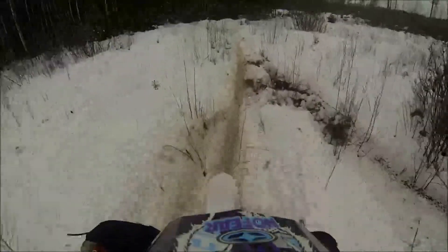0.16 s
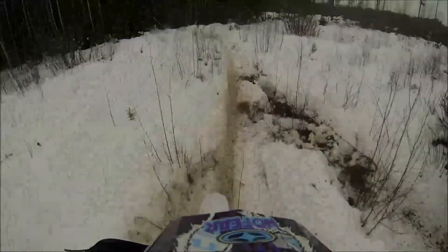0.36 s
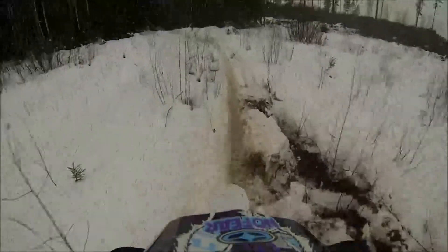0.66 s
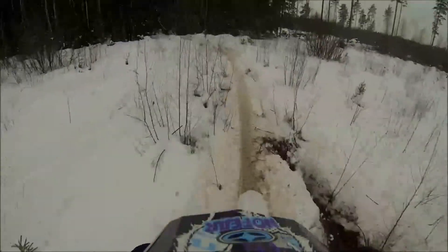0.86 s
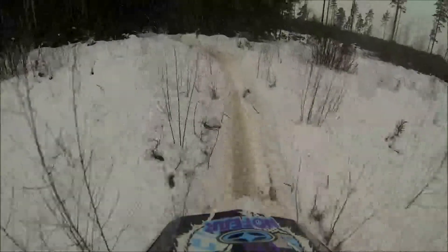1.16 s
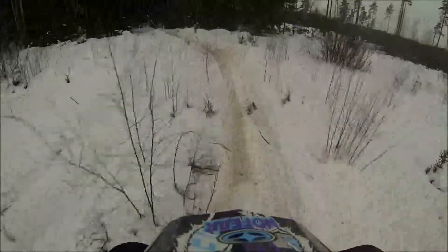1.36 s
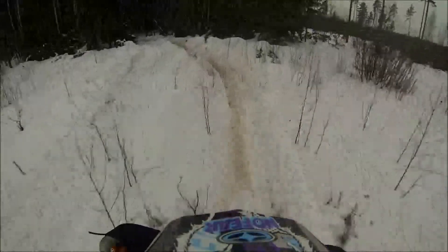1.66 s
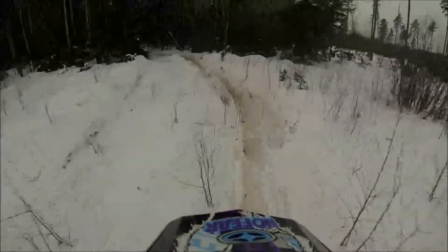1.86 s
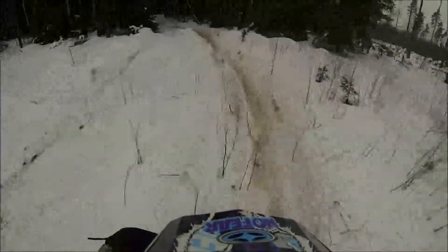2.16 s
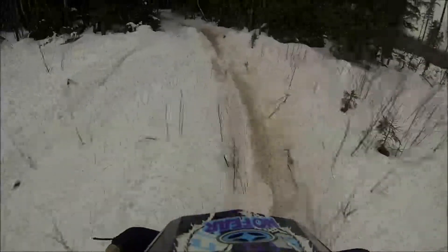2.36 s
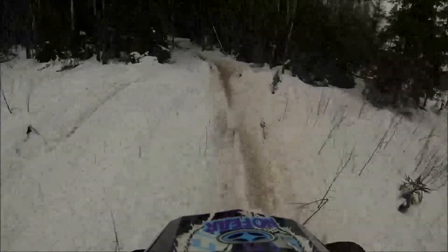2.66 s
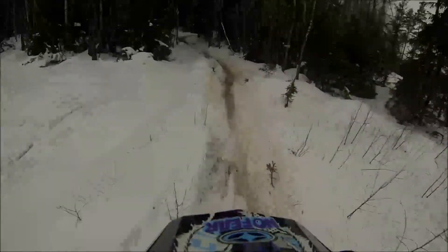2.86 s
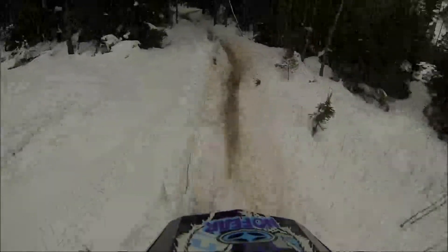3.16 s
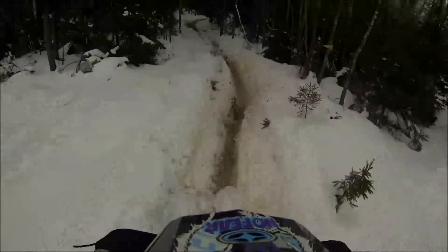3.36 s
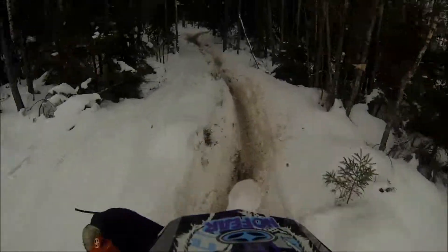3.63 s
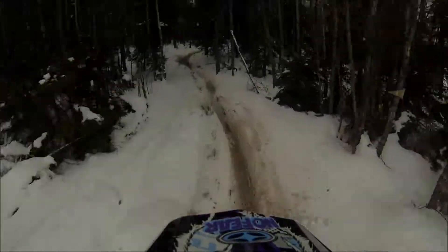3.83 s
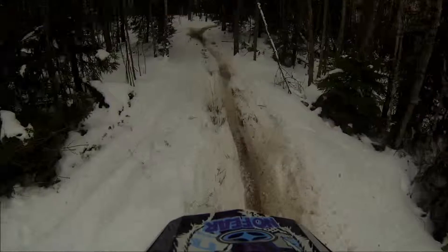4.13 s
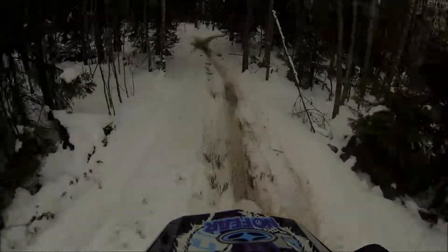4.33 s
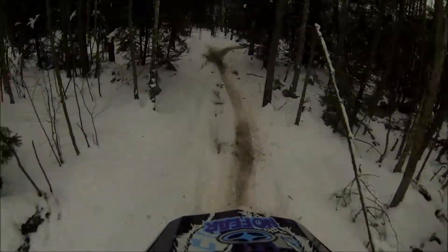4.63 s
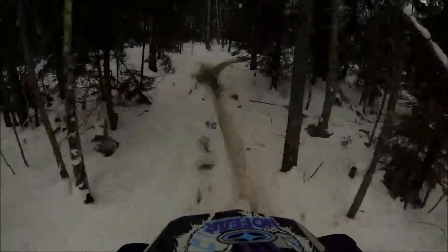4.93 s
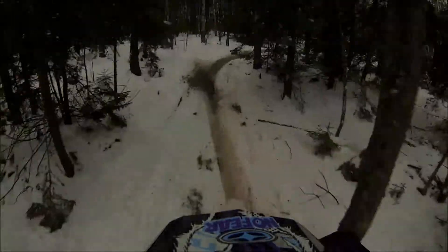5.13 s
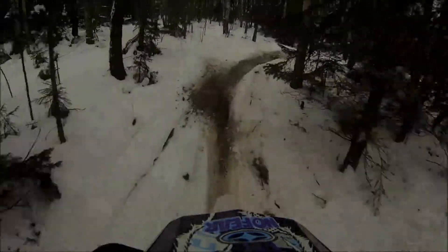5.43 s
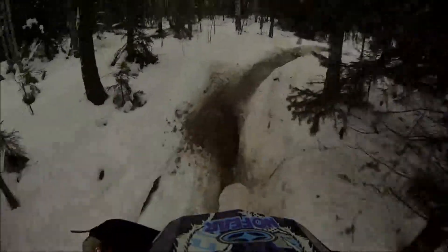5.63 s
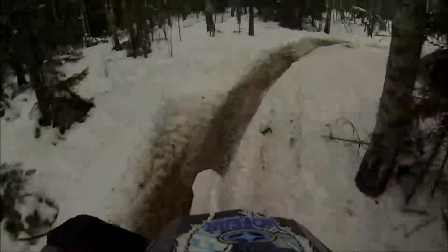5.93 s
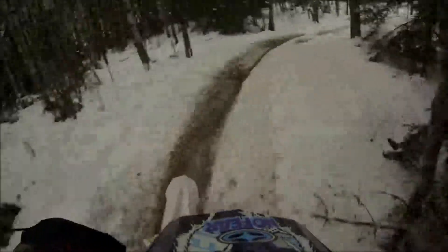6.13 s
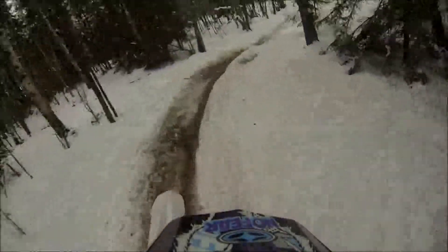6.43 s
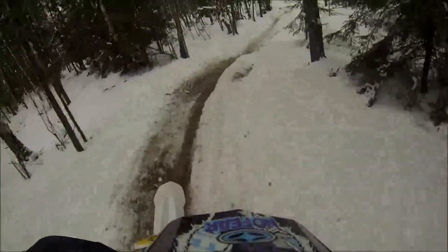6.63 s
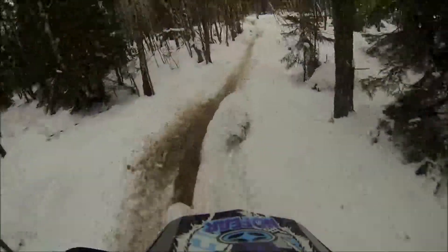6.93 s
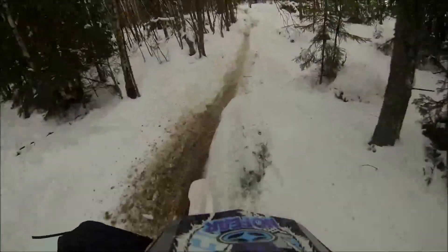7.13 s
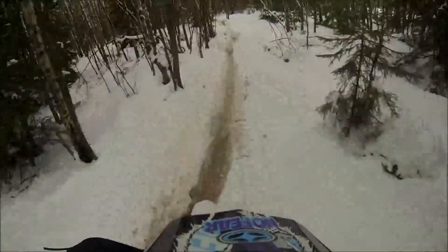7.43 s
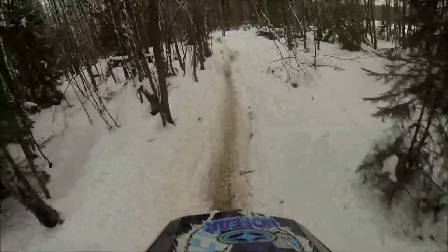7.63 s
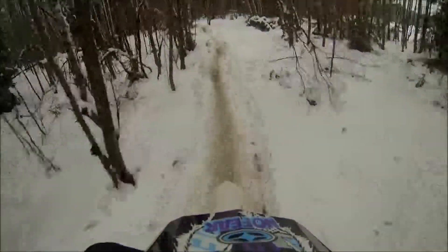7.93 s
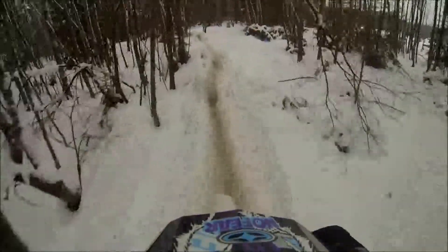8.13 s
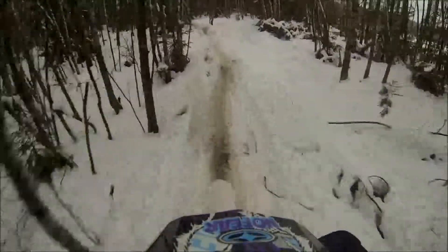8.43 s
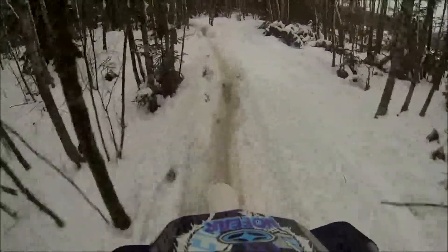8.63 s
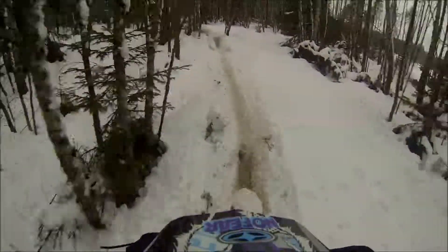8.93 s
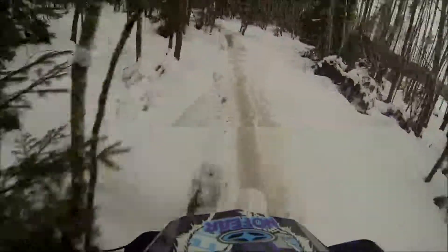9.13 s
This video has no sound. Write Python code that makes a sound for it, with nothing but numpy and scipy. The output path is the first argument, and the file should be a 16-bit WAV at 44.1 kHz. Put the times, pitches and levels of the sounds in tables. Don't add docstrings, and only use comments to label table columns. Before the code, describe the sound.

Close, boxy helmet-camera sound of a small motorcycle on slushy, rough ground. The exhaust sputters, then rises in several throttle pulls separated by coasting. Deep wind buffets, dull mount thumps, faint chatter and twig ticks run across it. A sharp crack comes before the highest revs; later, with the throttle closed, hard knocks and a short stuttering scrape. Slow lumpy firing follows, then brisk blips to the end. Loud hits briefly push everything down.

```python
import sys
import numpy as np
from scipy import signal
from scipy.fft import rfft, irfft, next_fast_len
from scipy.io import wavfile
from scipy.ndimage import uniform_filter1d

SR = 44100
rng = np.random.default_rng(int(sys.argv[2]) if len(sys.argv) > 2 else 0)


def store_wav(level_fs):
    pcm = np.round(np.clip(np.atleast_2d(level_fs), -1, 1) * 32767)
    wavfile.write(sys.argv[1], SR, pcm.T.astype(np.int16))


def invert_db(level):
    return 10 ** (np.asarray(level, dtype=float) / 20)


N = 409248
T = np.arange(N) / SR
MS = np.arange(0, N / SR, .001)

# (frequency [Hz], width [Hz], level [dB])
KNOCK_MODES = [(1430, 258, 0.0051), (335, 93, 0.0027)]


def level(x):
    return x / np.sqrt(np.mean(x ** 2))


def ring(x, modes, order=1):
    size = next_fast_len(N + SR)
    s = 1j * np.arange(size // 2 + 1) * SR / size
    shape = 0
    for k, (hz, width_hz, db) in enumerate(modes):
        resonance = width_hz * s / (s * s + width_hz * s + hz * hz)
        shape = shape + (-1) ** k * invert_db(db) * resonance ** order
    return irfft(rfft(x, size) * shape, size)[:N]


def colour(x, points):
    hz, db = np.transpose(points)
    grid = np.arange(N // 2 + 1) * SR / N + 1
    gain_db = np.interp(np.log(grid), np.log(hz), db, -120, -120)
    return irfft(rfft(x) * invert_db(gain_db), N)


def curve(rows):
    s, *columns = np.transpose(rows)
    return [np.interp(T, s, column) for column in columns]


def walk(rate):
    hold = int(SR / rate)
    steps = np.repeat(rng.standard_normal(N // hold + 1), hold)
    return 1.27 * uniform_filter1d(steps, hold)[:N]


def add(out, s, shape):
    i = int(s * SR)
    out[i:i + len(shape)] += shape[:N - i]


def push(length_s):
    return np.hanning(int(max(length_s, .0002) * SR))


def gain_control_db():
    # (time [s], depth [dB])
    ducks = [(0.536, 6), (2.3, 1.5), (2.475, 0.5), (2.872, 11.5), (3.076, 9.5), (3.76, 11.5), (3.952, 19.5),
             (4.25, 5.5), (5.052, 28), (5.236, 12.5), (5.35, 2.5), (5.54, 8.5), (5.679, 15), (5.835, 23),
             (6.062, 26), (6.295, 16), (7.061, 9.5), (7.352, 15.5), (8.018, 9.5), (8.297, 14.5),
             (8.72, 10.5), (8.92, 6.5), (9.246, 12)]
    recover_s = 0.11
    drop_db = sum(db * np.exp(-np.maximum(MS - s, 0) / recover_s) * (MS > s) for s, db in ducks)
    return -np.interp(T, MS, uniform_filter1d(drop_db, size=5))


def wind():
    # (time [s], level [dB])
    calm_wind = [(0, -17.5), (1.0, -18.5), (1.9, -18.5), (2.5, -18.5), (3.3, -21), (4.1, -19.5),
                 (4.6, -18.5), (5.3, -22.5), (5.8, -16.5), (6.3, -23.5), (6.9, -16), (7.5, -21), (8.1, -18),
                 (8.6, -19.5), (9.28, -21.5)]
    # (time [s], swell [dB])
    gusts = [(.44, -5), (1.741, 6.5), (2.12, 1.5), (2.27, 1.5), (2.9, 10.5), (3.071, 11.5), (3.36, 9),
             (3.72, 6), (3.95, 8), (4.24, 6.5), (4.96, 5.5), (5.22, 8), (5.35, 6.5), (5.53, 6), (6.12, 8.5),
             (6.279, 13.5), (7.06, 5.5), (7.341, 8), (7.68, 5), (8.3, 7), (8.43, 0), (8.71, 4.5), (8.92, 5),
             (9.22, 9)]
    # (frequency [Hz], width [Hz], level [dB])
    air_modes = [(11, 15.1, -0.5), (22.57, 15.7, 1), (52.1, 53, -14.5), (89.7, 21, -14.5), (133, 137, -31)]
    gust_s, duck_share = 0.035, 0.32
    calm_db, = curve(calm_wind)
    gust_db = sum(swell_db * np.exp(-((MS - s) / gust_s) ** 2) for s, swell_db in gusts)
    wind_db = calm_db + np.interp(T, MS, gust_db) + duck_share * gain_control_db()
    rumble = level(ring(rng.standard_normal(N), air_modes, order=2))
    return invert_db(wind_db - 1.3 + 0.89 * walk(20)) * rumble


def spray():
    # (start [s], length [s], level [dB])
    throws = [
        (0, 0.0095, -44),
        (6.422, .3, -62),
        (6.76, .03, -58),
        (6.816, 0.073, -56.5),
        (6.918, .43, -64.5),
    ]
    size = 0
    for s, length_s, db in throws:
        flying = (MS >= s) * (MS < s + length_s)
        size = size + invert_db(db - 6.8 * (MS - s) / length_s) * flying
    fade = np.interp(T, MS, uniform_filter1d(size, size=14))
    droplets = [(5570, 1200, 7.0), (8900, 2500, -3.5), (12500, 3500, -7)]
    hiss = level(ring(rng.standard_normal(N), droplets, order=2))
    return fade * invert_db(2.5 * walk(50)) * hiss


def slaps():
    # (time [s], peak [dB], push or pull [signed factor])
    slap_events = [(2.28, -11, -0.78), (3.071, 9, 0.097), (3.859, -9.5, -0.87), (4.248, -23, -0.88),
                   (4.408, -32, -1.6), (4.91, -12, -1.11), (5.228, -11.5, -1.15), (5.34, -17.5, -1.2),
                   (5.987, -18, -1.3), (7.349, -1, -0.68), (8.006, 0.5, -0.54), (8.688, -16, -0.83),
                   (8.91, -13, -1.5), (9.241, -12, -0.72), (6.06, -4.5, -0.66), (5.041, -2, 0.77),
                   (8.719, -21, 0.34)]
    force = np.zeros(N)
    for s, db, way in slap_events:
        add(force, s - .006, way * invert_db(db + 1.5) * push(0.011))
    return ring(force, [(41, 88, 0.0026)])


def bumps():
    # (time [s], peak [dB], sharp
    # edge over peak [dB])
    big_thumps = [(0.207, -7, -16.5), (0.295, -10, -16), (0.584, -10.5, -20), (0.909, -13, -19),
                  (1.638, -7.5, -22.5), (1.89, -8.5, -12.5), (2.728, -8, -14.5), (3.412, -9.5, -21),
                  (3.567, -11.5, -8), (3.765, -8, -12), (3.937, -13, -14), (4.45, -9, -24), (4.576, -11, 0),
                  (4.66, -9, -21), (4.811, -9.5, -14), (4.977, -9.5, -1), (5.672, -10.5, -3.5),
                  (5.754, -7, -5), (5.988, -11, -20.5), (6.05, -10, -22.5), (6.288, -0.5, -34),
                  (6.873, -11.5, 2), (7.086, -10, -23.5), (7.899, -8.5, 9), (8.063, -10, -5),
                  (8.274, -10, -22.5), (8.44, -11, 1), (8.587, -10, -12), (8.943, -9, 0),
                  (9.105, -8.5, -4.5)]
    # (time [s], peak [dB])
    ripples = [(0.53, -17), (0.684, -18.5), (0.854, -17), (2.257, -13.5), (2.49, -19), (3.116, -12.5),
               (4.022, -16.5), (5.141, -20.5), (5.323, -24), (5.602, -23.5), (7.336, -14), (7.402, -16),
               (7.998, -24), (8.68, -20), (8.736, -11.5)]
    # (frequency [Hz], width [Hz], level [dB])
    mount_modes = [(86.5, 9.2, 10.46), (114.6, 74, 1.64)]
    ripple_edge_db = -11
    force = np.zeros(N)
    for s, db, edge_db in big_thumps + [(s, db, ripple_edge_db) for s, db in ripples]:
        shape = push(0.0047 * invert_db(-.3 * (edge_db + 7.5)))
        add(force, s, invert_db(db + 46.0) * shape / shape.sum())
    return ring(force, mount_modes)


def rattles():
    # (time [s], peak [dB])
    chatter = [(0.2184, -38), (0.2284, -48), (0.2778, -59), (0.2778, -42.5), (0.3072, -48), (0.3247, -43),
               (0.336, -53), (0.408, -43), (0.4754, -46.5), (0.5201, -36.5), (0.5502, -46), (3.77, -43.5),
               (3.7982, -47), (3.8147, -42), (3.8751, -43), (3.8824, -46.5), (4.25, -38.5), (5.8886, -50.5),
               (5.8984, -49), (5.9024, -56), (8.6953, -38), (8.7076, -47), (8.751, -40),
               (1.7839, -46), (1.9076, -38), (2.0254, -40.5), (2.0718, -43), (2.2683, -34.5),
                     (2.3801, -47), (2.4045, -43), (2.4334, -39), (2.5003, -45), (2.6764, -49),
                     (4.8402, -38.5), (4.9111, -41), (4.9849, -34.5), (5.0388, -34), (5.162, -46),
                     (5.183, -47), (5.2294, -36), (5.3092, -56), (5.3416, -51), (5.5611, -44),
                     (5.6075, -42), (5.6569, -44), (5.6783, -47), (5.7043, -49), (3.0804, -34),
                     (5.9429, -53.5), (6.0464, -35.5), (6.0604, -42.5), (6.2397, -38)]
    clicks = np.zeros(N)
    for s, db in chatter:
        add(clicks, s - .0005, invert_db(db) * push(.0035))
    clicks = clicks * rng.standard_normal(N)
    bright = invert_db(2) * ring(clicks, [(3220, 2780, 0)], order=2)
    dull = invert_db(3) * ring(clicks, [(640, 320, 0.01)])
    return bright + dull


def twigs():
    # (time [s], peak in the housing [dB], shell over peak [dB])
    ticks = [(0.257, -43, -8), (2.071, -22, -21.5), (2.27, -20, -20.5), (2.4928, -21, -27),
             (2.8681, -32.5, -7), (3.0563, -15.5, -31), (3.742, -40, -0.5), (3.687, -23.5, -24),
             (3.849, -29, -26), (3.8621, -41, -14), (4.2382, -38.5, -7.5), (4.724, -28, -16),
             (4.9098, -43, -11), (4.9847, -55, 4), (5.0414, -45, -3.5), (5.2304, -42.5, 0),
             (5.3088, -26, -42), (5.4004, -25.5, -31.5), (5.6068, -26.5, -15), (5.6775, -45, 0),
             (5.982, -49.5, -3.5), (6.4284, -24, -39), (6.6943, -26, -31), (7.3309, -21, -25),
             (8.0086, -37, -1), (8.9134, -28.5, -11.5), (9.229, -37.5, -4.5)]
    # (time [s], peak [dB], fade [s])
    scrape = [
        (5.7724, 0.5, 0.0067),
        (5.7854, -11, 0.0075),
        (5.793, -10.5, 0.0074),
        (5.807, -7, 0.0046),
        (5.8123, -6.5, 0.0053),
        (5.8224, -13.5, 0.002),
    ]
    # (frequency [Hz], width [Hz], level [dB])
    twig_modes = [(1426, 295, 12), (3010, 520, 8), (5000, 1900, -3), (11300, 9700, -36), (576, 230, 0)]
    low, high, slip = np.zeros((3, N))
    for s, db, shell_db in ticks:
        add(low, s - .001, invert_db(db + 9.5) * push(0.012))
        add(high, s - .001, invert_db(db + shell_db + 6.0) * push(0.0048))
    for s, db, fade_s in scrape:
        add(slip, s, invert_db(db - 6.0) * np.exp(-T[:1500] / fade_s))
    low_noise, high_noise = rng.standard_normal((2, N))
    housing = ring(low * low_noise, KNOCK_MODES[:1], order=2)
    shell = ring(high * high_noise, [(3420, 3100, 0.036)], order=2)
    return housing + shell + ring(slip * high_noise, twig_modes)


def cracks():
    # (time [s], peak [dB], body over peak [dB], contact [s])
    crack_events = [
        (3.9425, -2.5, -3, 0.00053),
        (5.754, -10, 3, 0.00042),
        (6.032, -46, -10, 0.00042),
        (6.0529, -17, 5.5, 0.00091),
        (6.285, -16.5, 4, 0.0008),
        (8.288, -13.5, 5.5, 0.00041),
    ]
    ping, body, splinter = np.zeros((3, N))
    for s, db, body_db, length_s in crack_events:
        add(ping, s - .0005, -invert_db(db + 2.5) * push(length_s))
        add(ping, s + 0.00102, -invert_db(db + 15.0) * push(length_s))
        add(body, s - .0006, invert_db(db + body_db + 9.0) * push(0.0017))
        add(splinter, s - .0005, invert_db(db - 2.5) * push(0.0041))
    splinter = ring(splinter * rng.standard_normal(N), [(2770, 1460, 0.012)], order=2)
    knock = ring(ping, KNOCK_MODES[:1]) + ring(body, KNOCK_MODES[1:]) + .3 * body + splinter
    flat = .8 * np.tanh(knock / .8)
    return signal.lfilter(*signal.butter(2, 5500, fs=SR), flat)


def throttle(fade_db_s):
    # (start [s], length [s], bark at the end [dB], climb on the way [dB], boom over bark [dB])
    twists = [(0.0, 0.23, -43.5, -12.5, 8.5), (0.26, 0.29, -41.5, 2.5, 7), (0.587, 0.17, -29.5, 14, 6.5),
              (0.758, 0.11, -35, -4, 5), (0.916, 0.12, -29.5, -0.5, 8), (1.04, 0.26, -32, -0.5, 7.5),
              (1.321, 0.16, -29, 7.5, 6.5), (2.759, 0.1, -30.5, 7.5, 7), (3.112, 0.2, -29, 11, 7),
              (3.307, 0.2, -39.5, -5.5, 5.5), (3.98, 0.12, -34.5, 5.5, 6), (4.308, 0.093, -26.5, 4.5, 10),
              (4.438, 0.051, -34, -3, 6.5), (4.475, 0.27, -32.5, -1, -4), (6.424, 0.15, -41.5, 5.5, 8),
              (6.551, 0.11, -32, 0.5, 3.5), (6.866, 0.066, -32.5, 11, 6.5), (7.199, 0.098, -34, 2.5, 8),
              (7.49, 0.11, -28.5, 3, 5), (7.66, 0.088, -30, 5.5, 8.5), (7.785, 0.07, -30.5, -0.5, 2),
              (7.845, 0.046, -31, -5, 7), (8.064, 0.17, -32.5, 3.5, 6), (8.384, 0.18, -29, 7, 6)]
    open_db_s = 498.5
    best_db, boom_db = np.full(len(MS), -90.), np.zeros(len(MS))
    for s, length_s, db, climb_db, low_db in twists:
        held_db = db - climb_db * np.clip(1 - (MS - s) / length_s, 0, 1)
        before_s, after_s = np.maximum(s - MS, 0), np.maximum(MS - s - length_s, 0)
        now_db = held_db - open_db_s * before_s - fade_db_s * after_s
        boom_db = np.where(now_db > best_db, low_db, boom_db)
        best_db = np.maximum(now_db, best_db)
    return np.interp(T, MS, best_db), np.interp(T, MS, uniform_filter1d(boom_db, size=30))


def lock(turns, times):
    slip = [0.]
    for at in np.interp(times, T, turns):
        slip.append(np.round(at + slip[-1]) - at)
    return turns + np.interp(T, times, slip[1:])


def engine():
    # (time [s], firing rate [Hz])
    revs = [
        [(0.0, 60.7), (0.174, 52.3), (0.3, 45.8), (0.38, 56.8), (0.5, 50.6), (0.6, 48.5), (0.7, 50),
         (0.82, 53.1)],
        [(0.86, 58), (1.048, 82.2), (1.068, 82.6), (1.12, 79.5), (1.146, 77.8), (1.244, 86.7), (1.285, 87.24)],
        [(1.316, 69.77), (1.42, 76.08), (1.524, 82.94), (1.7, 63)],
        [(2.72, 52.91), (2.794, 54.76), (3.004, 54.66), (3.154, 59.82), (3.256, 79.07), (3.332, 68.74),
         (3.4, 76.83), (3.524, 87)],
        [(4.0, 84.4), (4.162, 82), (4.288, 58.74)],
        [(4.31, 59.95), (4.378, 69.2), (4.42, 70.34), (4.47, 81.4), (4.5, 87.12), (4.596, 94.88),
         (4.634, 103.4), (4.66, 103.1)],
        [(4.7, 98.15), (4.73, 82.18)],
    ]
    # (time [s], firing rate [Hz])
    revs_after_bend = [
        [(6.4, 46.7), (6.524, 50.9), (6.7, 60.2), (6.812, 56.7), (6.882, 57), (6.956, 59.8)],
        [(7.17, 49.66), (7.246, 50.07), (7.398, 48.93)],
        [(7.48, 56.9), (7.528, 67.58), (7.55, 72.4), (7.608, 83), (7.616, 82.6), (7.67, 69.18)],
        [(7.69, 63.67), (7.74, 70.95), (7.79, 72.53), (7.855, 67.37), (7.91, 75.76)],
        [(8.09, 61.78), (8.132, 72.74), (8.148, 72.7), (8.172, 70.5), (8.21, 72.32), (8.265, 76.74)],
        [(8.4, 63.73), (8.434, 68.46), (8.472, 76.03), (8.5, 78.57), (8.62, 80.7)],
    ]
    # (start [s], end [s], lumpiness [0-1])
    uneven = [
        (0, .87, .95),
        (1.09, 1.3, .6),
        (2.7, 3.1, .65),
        (4.7, 4.8, .5),
        (6.4, 6.75, .15),
        (6.82, 7.45, .6),
        (8.05, 8.45, .3),
    ]
    # (time [s], peak [dB])
    hard_charges = [(0.009, -20.5), (0.028, -24.5), (0.044, -24), (0.076, -19.5), (0.093, -26.5),
                    (0.127, -23), (0.146, -23.5), (0.186, -24), (0.23, -29.5), (0.273, -32.5), (0.294, -31),
                    (0.367, -30), (0.384, -33), (0.399, -31), (0.443, -29.5), (0.499, -19.5), (0.539, -31),
                    (0.583, -30.5), (0.623, -28), (0.663, -21.5), (0.68, -30), (0.721, -22.5), (0.796, -29),
                    (0.817, -27.5), (0.835, -23.5), (0.872, -21), (1.107, -16.5), (1.144, -17),
                    (1.183, -14), (1.287, -16), (2.728, -26), (2.791, -18), (4.724, -14),
                    (6.429, -29.5), (6.514, -28), (6.592, -21), (6.663, -25), (6.851, -34.5),
                       (6.868, -30), (6.913, -30), (6.931, -36), (6.947, -42), (7.192, -38), (7.213, -34),
                       (7.239, -33), (7.255, -27), (7.277, -24), (7.297, -27)]
    # (time [s], level [dB])
    coasting = [(0, -32.5), (.4, -49.5), (1.0, -42.5), (1.23, -30), (1.5, -38.5), (1.9, -43), (2.8, -41.5),
                (3.5, -39), (3.93, -41), (4.8, -43), (5.5, -38.5), (6.0, -39), (6.8, -40), (7.05, -37.5),
                (7.35, -37.5), (8.0, -39.5), (8.8, -34.5), (9.28, -40)]
    # (frequency [Hz], width [Hz], level [dB])
    pipe_modes = [(402, 100, -20), (528.4, 101, 3), (594, 95, -0.5), (643, 43, -10), (940, 210, -31)]
    # (frequency [Hz], width [Hz], level [dB])
    boom_modes = [(82, 69, -1), (223, 39.4, 1.5), (282.2, 48.3, 5.5)]
    # (frequency [Hz], width [Hz], level [dB])
    housing_modes = [(304, 108, 1), (543, 198, -4.5), (829, 125, -16), (1029, 255, -12.5), (1366, 191, 2),
                     (1710, 670, -21.5), (1990, 114, -11.5)]
    # (frequency [Hz], width [Hz], level [dB])
    shell_rings = [(2680, 120, 0), (3340, 130, 3), (3800, 130, 0), (4850, 160, 4), (7750, 300, 4),
                   (10700, 450, 2)]
    # (frequency [Hz], level [dB per Hz])
    shell_spectrum = [(1290, -33.5), (1750, -4.5), (2200, 4.5), (2500, -1), (2730, -3.5), (2870, -0.5),
                      (3420, -7), (4080, -8.5), (4790, -14), (6610, -15), (7880, -21.5), (8540, -20.5),
                      (11000, -27.5), (13800, -32), (15000, -43)]

    hz, = curve(np.vstack(revs + revs_after_bend))
    even = .08
    lumpy = even + sum((x - even) * (T >= a) * (T < b) for a, b, x in uneven)
    lumpy = uniform_filter1d(lumpy, size=2000)
    gain_db = gain_control_db()

    bark_db, boom_db = throttle(fade_db_s=388.5)
    coast_db, = curve(coasting)
    load_db = np.maximum(throttle(fade_db_s=102)[0] - 1 - coast_db, 0)
    speed_db = 0.1748 * np.clip(hz - 77, 0, 20)
    hiss_db = coast_db + load_db + speed_db * np.clip(load_db / 6, 0, 1)
    late_hz = np.interp(T - 0.034, T, hz)
    scream_db = uniform_filter1d(np.maximum(late_hz - 91.8, 0), size=4000)
    treble_db = -14.5 - 0.3 * load_db + scream_db

    turns = np.cumsum(hz * (1 + (.003 + .03 * lumpy) * walk(60))) / SR
    hard_s, hard_db = np.transpose(hard_charges)
    turns = lock(turns, hard_s)
    fired = np.flatnonzero(np.diff(np.floor(turns)))

    scatter_db = 1 + 1.5 * lumpy[fired]
    charge_db = -15 * lumpy[fired] ** 2 + scatter_db * rng.standard_normal(N // 100)[:len(fired)]
    hard = np.abs(fired[:, None] - hard_s * SR).argmin(axis=0)
    usual_peak_db = 10.5 + (bark_db + gain_db)[fired[hard]]
    charge_db[hard] = np.clip(hard_db - usual_peak_db, -6, 8)
    pulses = np.zeros(N)
    pulses[fired] = invert_db(charge_db) / np.sqrt(hz[fired])

    charge = np.append(level(pulses[fired]), 1)[np.floor(turns).astype(int) - 1]
    puff = .46 + .62 * charge ** .7 * np.exp(-(turns % 1) / .35)
    gas, valves, blow = rng.standard_normal((3, N)) * puff

    drive = level(pulses) + .13 * blow
    evened = level(pulses ** .6) + .14 * blow
    bark = level(ring(drive, pipe_modes, order=2))
    boom = invert_db(np.clip(boom_db, -12, 18) - 0.4) * level(ring(evened, boom_modes, order=2))
    exhaust = invert_db(bark_db - 1.0) * (bark + boom)

    housing = level(ring(gas + .3 * level(pulses), housing_modes, order=2))
    housing = invert_db(1.8 * walk(40)) * housing
    ringing_valves = valves + sum(ring(valves, [mode]) for mode in shell_rings)
    shell = level(colour(ringing_valves, shell_spectrum))
    shell = invert_db(0.95 * walk(60) + 2.0 * walk(15)) * shell
    hiss = invert_db(hiss_db) * (housing + invert_db(treble_db) * shell)
    return invert_db(gain_db) * (hiss + exhaust)


def scene():
    surroundings = wind() + spray() + slaps()
    knocks = bumps() + rattles() + twigs() + cracks()
    return (surroundings + knocks + engine())[None]


def roll_off(x):
    return signal.sosfilt(signal.butter(12, 15130, fs=SR, output="sos"), x)


def record(dry):
    swollen = (dry / 0.96) * (1 + 0.19 * (dry / 0.29) ** 2)
    hot = 1.095 * np.tanh(swollen)
    top_cut = signal.butter(10, 15100, fs=SR, output="sos")
    mix = np.clip(signal.sosfilt(top_cut, hot), -1, 1)
    return roll_off(mix)


dry = scene()
out = record(dry)
store_wav(out)
```